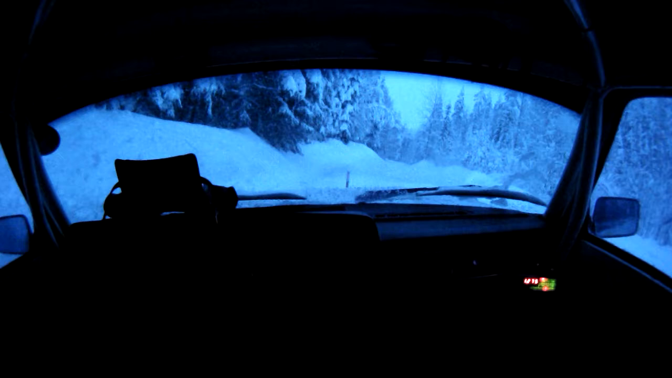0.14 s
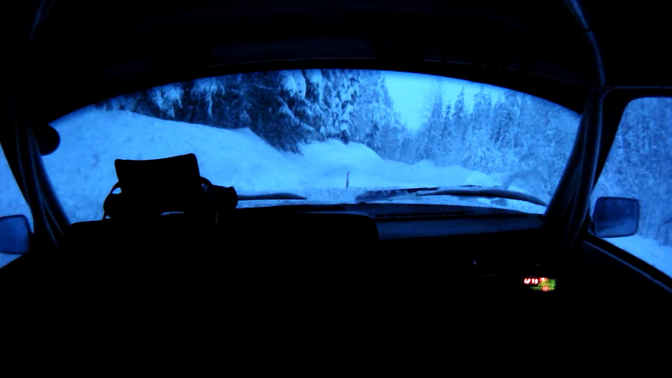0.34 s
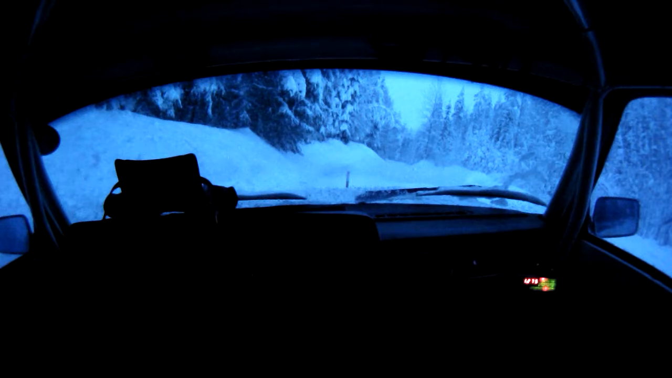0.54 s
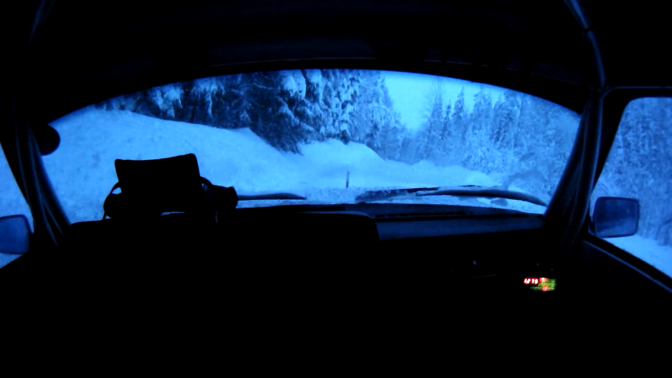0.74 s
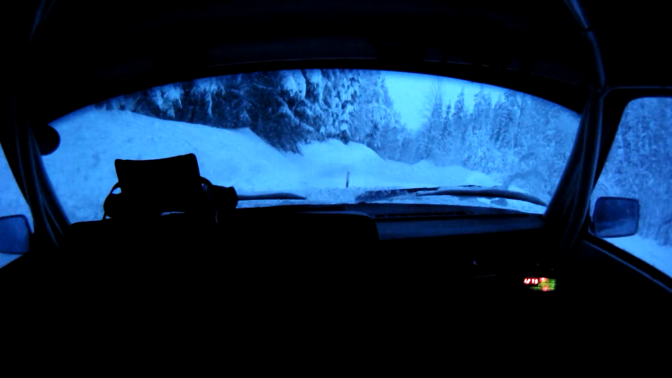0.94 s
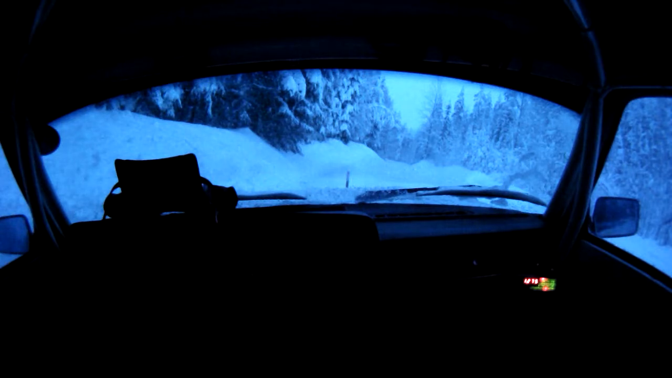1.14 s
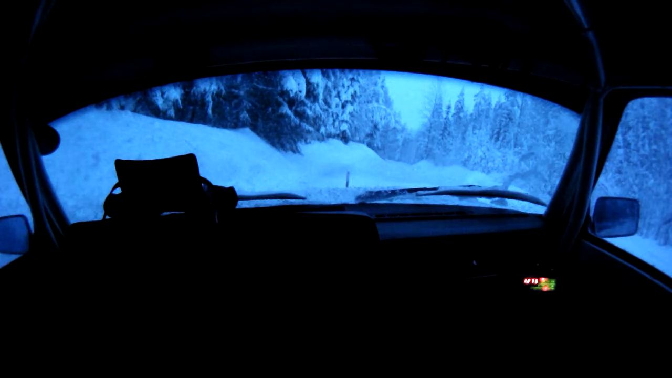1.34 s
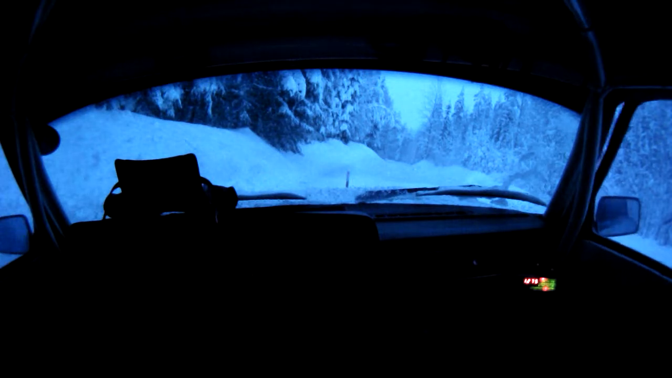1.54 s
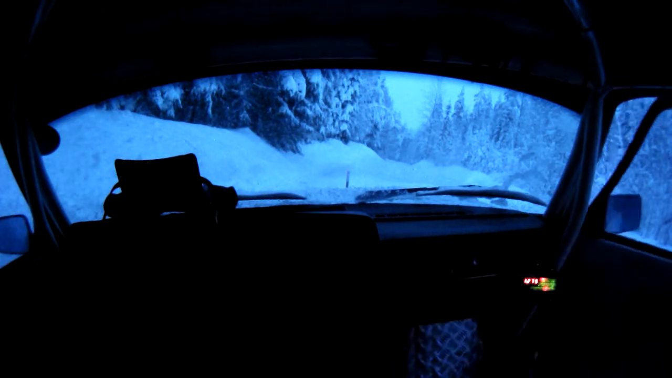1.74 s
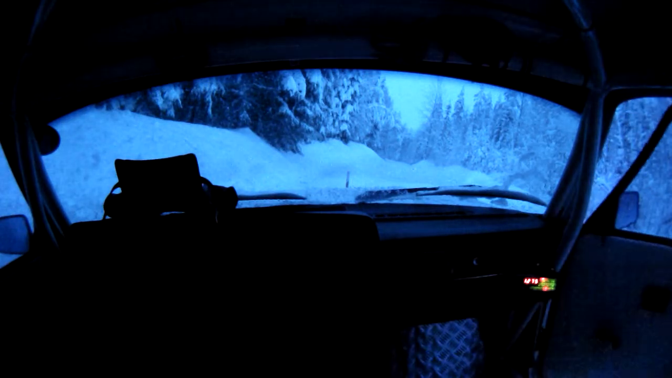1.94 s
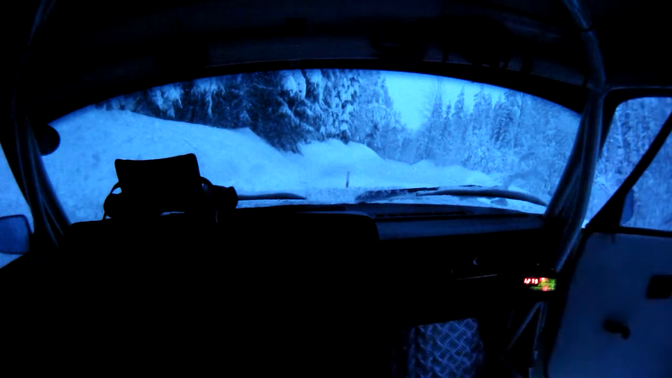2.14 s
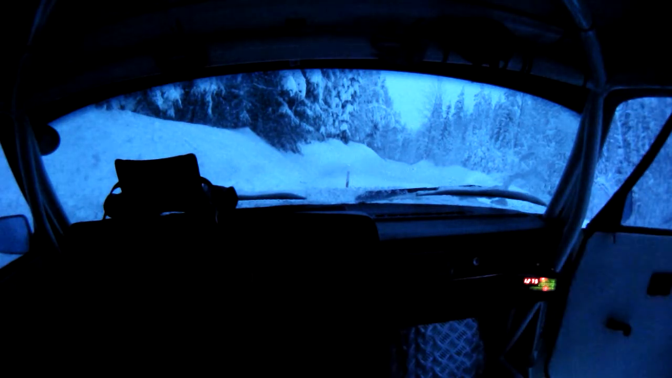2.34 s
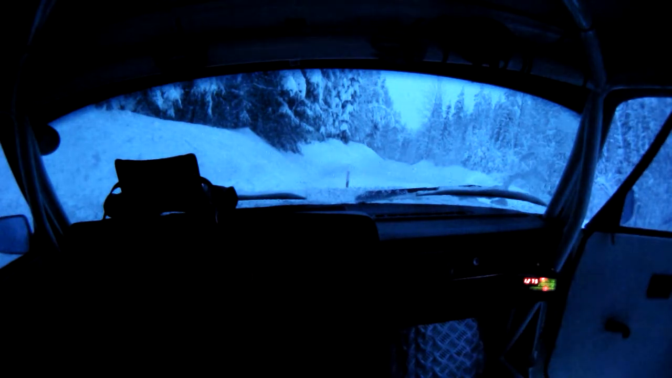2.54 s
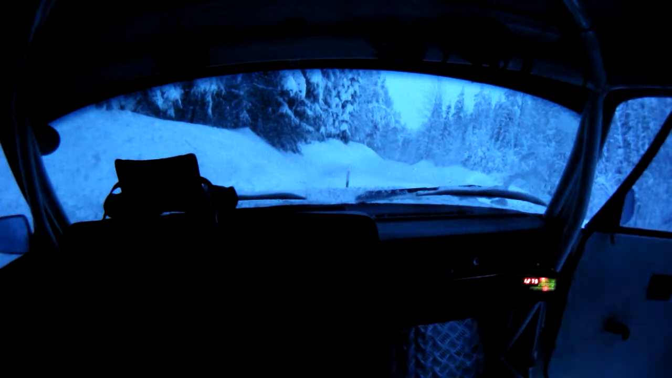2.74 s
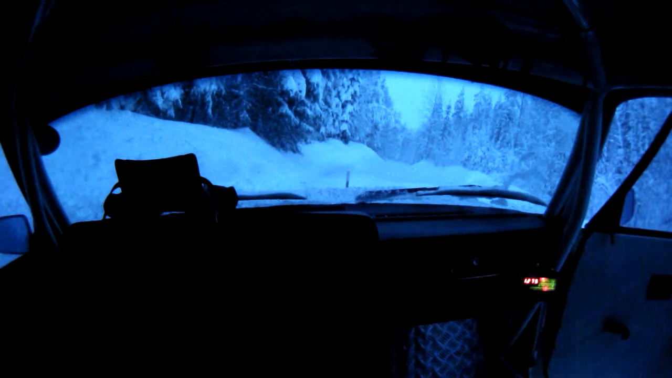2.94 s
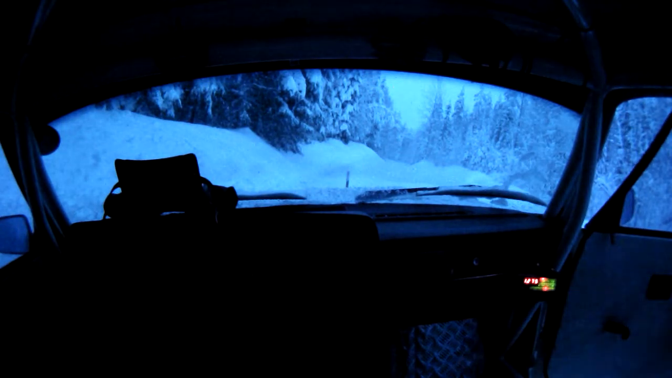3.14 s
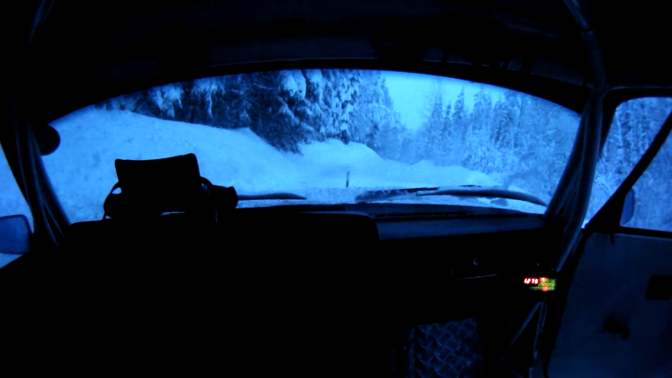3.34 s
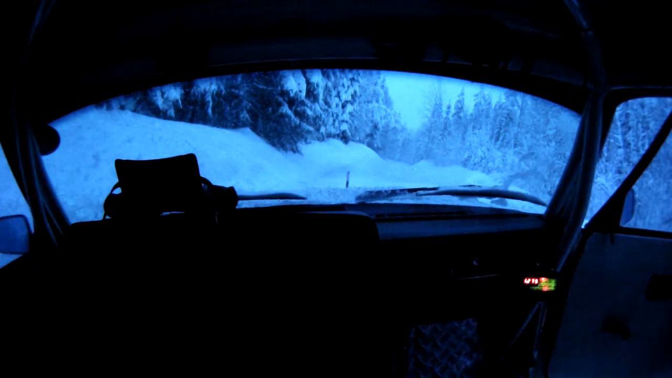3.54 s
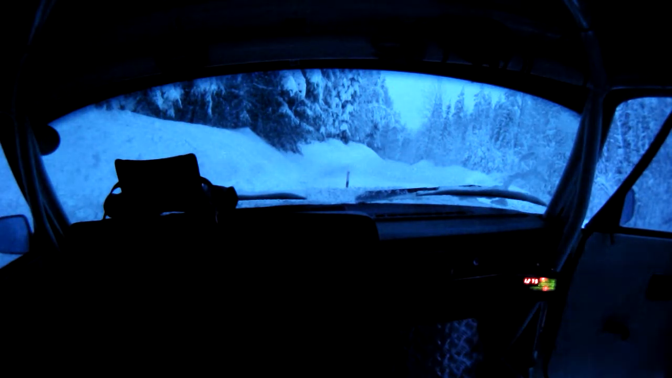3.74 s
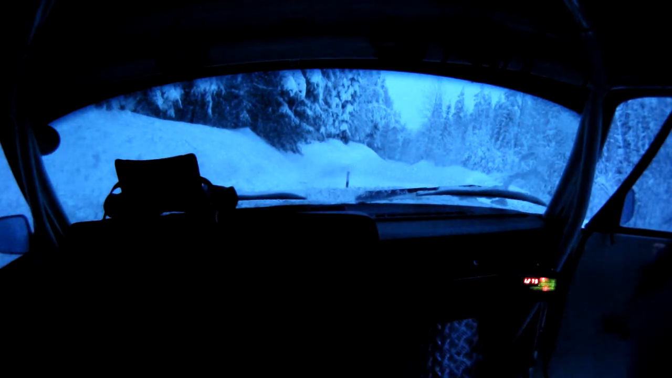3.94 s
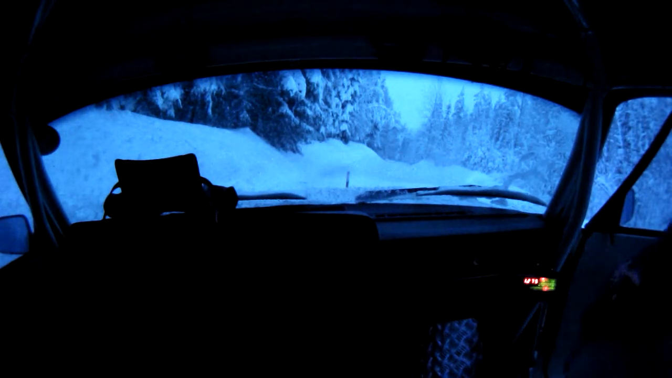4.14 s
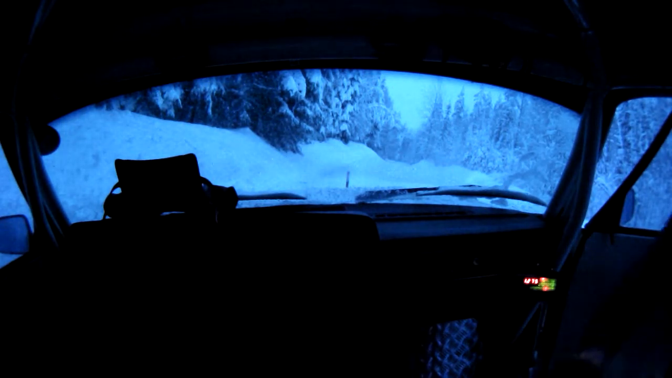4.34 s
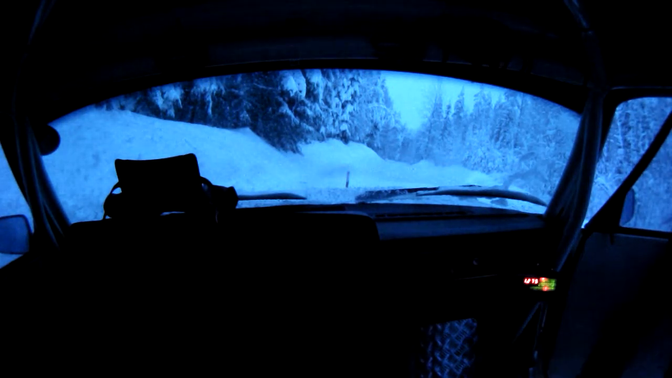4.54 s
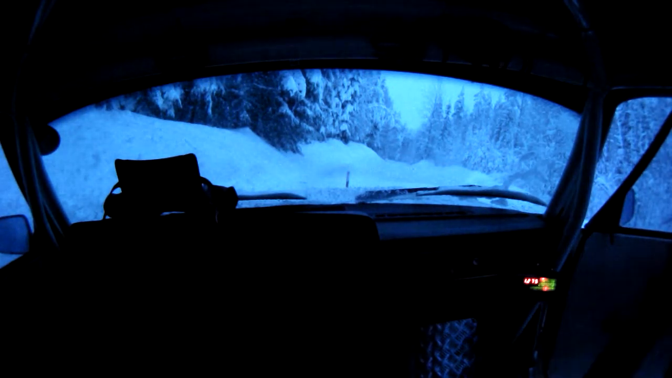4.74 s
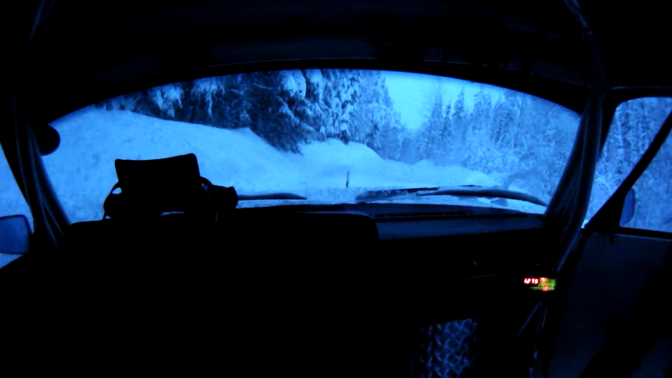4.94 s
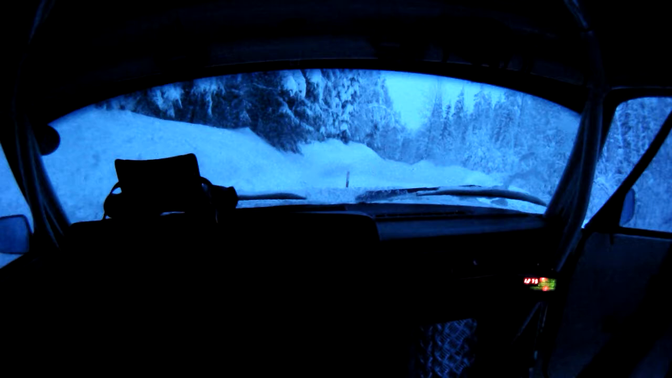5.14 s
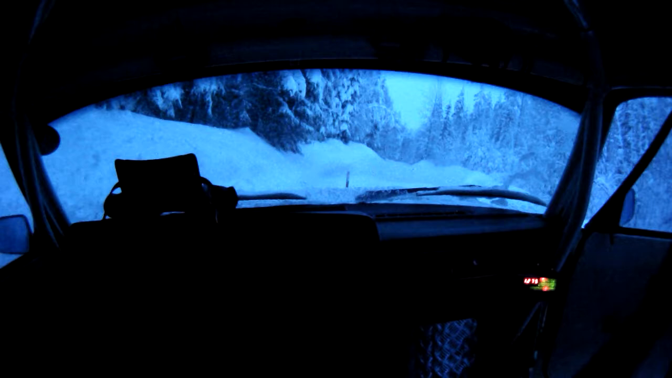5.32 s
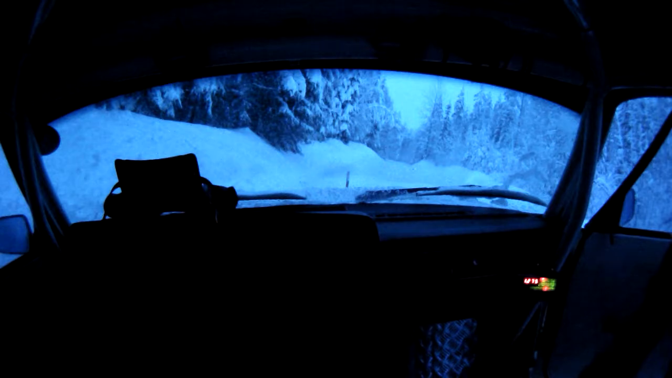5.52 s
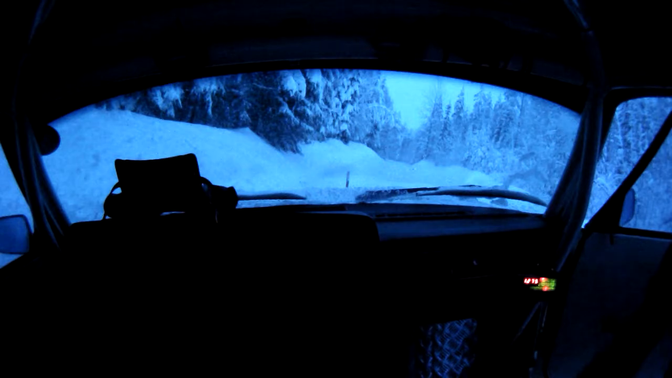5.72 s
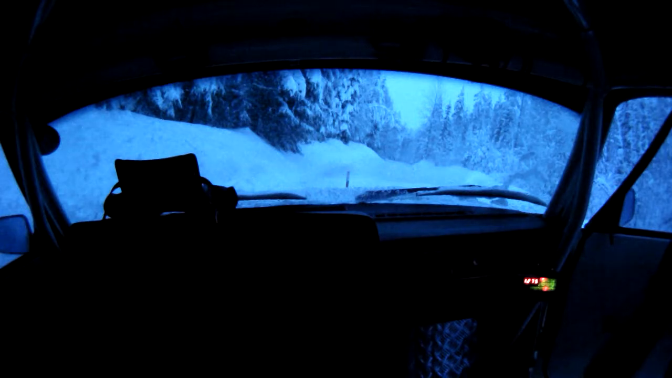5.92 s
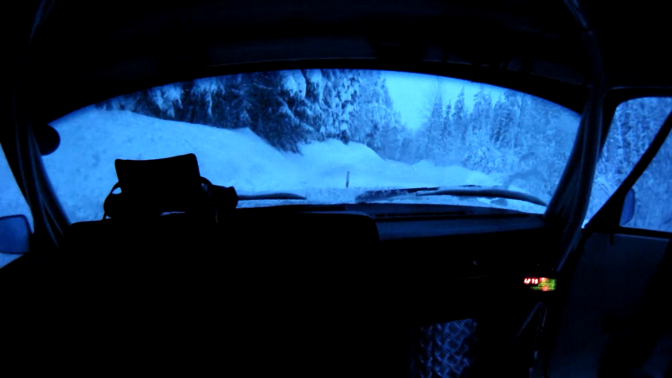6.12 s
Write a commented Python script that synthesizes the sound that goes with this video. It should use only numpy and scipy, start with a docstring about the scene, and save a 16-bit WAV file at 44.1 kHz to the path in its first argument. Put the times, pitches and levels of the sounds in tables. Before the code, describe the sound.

Heard close to the door inside a parked car, over a faint steady hiss. Small ticks come from about 0.4 seconds, and the handle knocks at 1.3. At 1.5 seconds the latch lets go with a loud, boomy clunk and a low push of cabin air. The hinge rubs faintly, and the door hits its stop with a second clunk near 2.2. Someone shifts in the seat with soft rustling, making a dull knock at 2.6 and a cluster of thumps from 3.2 to 3.6. Light plastic clicks begin around 3.8. A metal buckle clatters and briefly rings against hollow plastic from 4.3 to 4.5, followed by three loud, sharp snaps between 4.6 and 4.7. Quiet clothing rustle and a few softer clicks continue until about 5.6, then fade away by 6 seconds.

```python
"""Inside a car parked in the snow, a small stereo microphone close to the door. The handle is worked, the
latch lets go with a clunk and a suck of cabin air, and the door swings to its stop. Knocks chatter through
the trim and ring panel, cabin and floor pan; a metal buckle clatters, catches snap, cloth rustles.
Both channels hear the same sound with a different colour, over their own hiss and DC offset."""
import sys
import numpy as np
from scipy import signal
from scipy.fft import rfft, irfft
from scipy.io import wavfile
from scipy.ndimage import uniform_filter1d

SR = 44100
rng = np.random.default_rng(int(sys.argv[2]) if len(sys.argv) > 2 else 0)


def persist_wave(psi):
    """Save psi, clipped to +-1, as 16-bit WAV."""
    counts = np.round(np.clip(psi, -1, 1) * 32767).astype(np.int16)
    wavfile.write(sys.argv[1], SR, np.atleast_2d(counts).T)


N = 272538
T = np.arange(N) / SR
F = np.arange(N // 2 + 1) * SR / N + 1e-3

# someone shifting in the seat: t/s, rustle level/dB, rumble level/dB
MOVEMENT = [(0, -90.5, -87), (.79, -105, -73.5), (.84, -108, -56.5), (1.45, -86, -62.5), (1.7, -77.5, -45),
            (2.05, -74, -58.5), (3.15, -68, -62), (3.5, -63.5, -58), (3.9, -68, -57), (4.25, -75, -65),
            (4.55, -64, -52), (5.06, -64, -67), (5.46, -61, -58.5), (5.6, -68.5, -69), (5.75, -77, -75.5),
            (6.18, -88.5, -82)]


def blows():
    """Each blow on door, seat or trim chatters through the fittings and rings panel, cabin and floor."""
    # t/s, clack level/dB, crack over clack/dB, boom level/dB, depth/dB, chatter t60/s, struck place f/Hz
    hits = [(0.392, -77, 10, -74, -31.5, 0.05, 325), (0.83, -64.5, -18, -68, 18, 0.24, 320),
            (0.882, -65.5, 4.5, -71.5, -12, 0.12, 340), (1.027, -65, -5.5, -73, 2, 0.14, 255),
            (1.053, -67.5, 0, -60.5, -5.5, 0.068, 262), (1.27, -53, 5, -37.5, 2.5, 0.14, 347),
            (1.515, -26, -4.5, -20, -4, 0.094, 305), (1.549, -49, -4, -27.5, 9, 0.093, 277),
            (1.582, -44.5, -1.5, -33.5, -1.5, 0.12, 255), (1.79, -67.5, 8.5, -49.5, 0.5, 0.058, 620),
            (2.115, -58.5, -7, -44, 3, 0.39, 287), (2.131, -59, 8, -43, 7, 0.11, 343),
            (2.16, -28.5, -1, -32.5, -8, 0.13, 360), (2.363, -63, 3, -48.5, -5.5, 0.079, 410),
            (2.613, -53.5, -0.5, -37.5, 4, 0.34, 294), (2.706, -66, 3.5, -49, 13.5, 0.2, 350),
            (3.029, -53.5, 10.5, -70, -17.5, 0.096, 516), (3.201, -56, 10, -31.5, -5, 0.11, 280),
            (3.227, -56.5, 12, -25, 9.5, 0.063, 263), (3.337, -55.5, 4.5, -38.5, -3.5, 0.12, 378),
            (3.362, -52.5, 9.5, -42, 10, 0.1, 372), (3.554, -51, 11, -40.5, -5, 0.1, 326),
            (3.884, -59, 10, -59, 13, 0.071, 300), (4.297, -45.5, -29, -39, -1, 0.14, 394),
            (4.975, -67.5, 16.5, -63, 1, 0.13, 314), (6.124, -68, -2.5, -72, -14.5, 0.18, 298)]
    # modes of each part: f/Hz, level/dB, t60/s
    trim_modes = [(977, 8, 0.16), (1480, 13, 0.16), (1726, 22.5, 0.058), (1960, 13.5, 0.03),
                  (2030, -2, 0.11)]
    panel_modes = [(259, 2.5, 0.4), (279, -4, 0.42), (329, 3.5, 0.23), (378.4, -2, 0.34), (519, -0.5, 0.37),
                   (636, -2, 0.59)]
    cabin_modes = [(119.5, -3, 0.25), (132.6, -0.5, 0.7), (177, -4.5, 0.29), (205, -10, 0.56)]
    floor_modes = [(49, -22, 0.92), (63.6, 0.5, 0.21), (87.7, -1.5, 0.41)]
    strap_modes = [(2180, -68.5, 1.7)]
    # spectrum of the contact's hard edge: f/Hz, level/dB
    crack_spectrum = [(1180, -10), (2000, -8), (4250, -0.5), (5890, 1), (7230, -8), (15500, -33)]
    free_t60_s, place_db_per_octave = 0.13, 28
    knock, clack, crack, rings, boom = np.zeros((5, N))
    for hit, chance in zip(hits, rng.standard_normal((len(hits), 36))):
        s, clack_db, edge_db, boom_db, depth_db, t60, place_hz = hit
        rise = 0.0043 * 2 ** (max(boom_db + 40, 0) / 14.5)  # heavier blows build more slowly
        panel_db = boom_db - 5.5 - depth_db  # depth takes from the panel and gives to the floor pan
        floor_db = boom_db - 7.5 + depth_db
        add(crack, s, amp(clack_db + edge_db) * burst(rise, t60))
        add(clack, s, amp(clack_db) * burst(rise, 1.04 * t60, tail_db=-23.5))
        add(knock, s, amp(panel_db - 13) * burst(rise, 2.34 * t60))
        trim = ring(trim_modes, rise + 0.022, chance[::-1], detune=0.002, scatter_db=4.5)
        add(rings, s, amp(clack_db - 12) * trim)
        freedom = min(t60 / free_t60_s, 1)  # short chatter: the hand stays on and damps the panel
        # modes far from the struck place's own note are weaker
        panel = [(hz, db - place_db_per_octave * abs(np.log2(hz / place_hz)), ring_s * freedom)
                 for hz, db, ring_s in panel_modes]
        # panel, cabin and floor rings each swell in a few milliseconds after the blow
        add(rings, s, amp(panel_db) * ring(panel, rise + 0.0021, chance, detune=0.0087, scatter_db=1.5))
        add(boom, s, amp(boom_db) * ring(cabin_modes, rise + 0.0046, chance[::-1], scatter_db=1.5))
        add(boom, s, amp(floor_db) * ring(floor_modes, rise + 0.003, np.roll(chance, 5), scatter_db=6.5))
    add(boom, 2.17, ring(strap_modes, 0.01, np.zeros(2)))  # the check strap rings at the stop
    chatter = knock * noise(peaks([(407, 1010, 0)]))
    chatter += clack * (1.014 * noise(peaks([(1750, 2600, 0)])) + 0.23 * scraped(trim_modes, 9.5))
    chatter += crack * noise(shape(crack_spectrum))
    # loose parts rattle unevenly, and the low boom wavers irregularly in level
    return amp(3.1 * walk(120)) * rings + amp(0.5 * walk(300)) * chatter + amp(1.5 * walk(15)) * boom


def buckle():
    """A dropped metal buckle bounces and scrapes on hollow plastic, and both ring on."""
    # contacts: t/s, treble level/dB, plastic level/dB, metal level/dB, rise/s, chatter t60/s
    jingles = [(4.298, -79, -37, -49.5, 0.0062, 0.11), (4.402, -56, -56, -43.5, 0.0021, 0.18),
               (4.432, -69, -46.5, -28, 0.0037, 0.12), (4.448, -64, -71.5, -35.5, 0.0015, 0.044),
               (4.525, -65.5, -71, -47, 0.018, 0.074)]
    # modes of each part: f/Hz, level/dB, t60/s
    metal_modes = [(2468, -16, 0.08), (3655, -4, 0.75), (3830, -0.5, 0.13), (4130, -6.5, 0.071),
                   (4530, -10, 0.17), (5500, -8.5, 0.056), (6450, -9, 0.088), (7020, -12.5, 0.063),
                   (10550, -28, 0.1)]
    plastic_modes = [(710, 1.5, 0.2), (760, 0, 0.25), (977, -2.5, 0.12), (1214, 2, 0.21), (1755, 0, 0.13)]
    metal, plastic, treble, rings = np.zeros((4, N))
    for jingle, chance in zip(jingles, rng.standard_normal((len(jingles), 36))):
        s, treble_db, plastic_db, metal_db, rise, t60 = jingle
        contact = burst(rise, t60)
        add(metal, s, amp(metal_db) * contact)
        add(plastic, s, amp(plastic_db) * contact)
        add(treble, s, amp(treble_db) * contact)
        add(rings, s, amp(metal_db - 3) * ring(metal_modes, rise, chance, detune=0.00082, scatter_db=2.5))
        hollow = ring(plastic_modes, rise + 0.0024, chance[::-1], detune=0.0028, scatter_db=4.5)
        add(rings, s, amp(plastic_db - 0.5) * hollow)
    jangle = scraped(metal_modes, 8.5) + 0.6 * noise(peaks([(4900, 2500, 0)]))
    scrape = metal * jangle + 0.92 * plastic * scraped(plastic_modes, 29)
    return amp(3.5 * walk(90)) * rings + scrape + treble * noise(peaks([(11350, 11000, 0)]) ** 2)


def catches():
    """Plastic catches snap: a hard tick, a ping of its own pitch, a short ring of catch and cabin."""
    # t/s, level/dB, dull clack relative to the tick/dB, tick t60/s, ping f/Hz
    snaps = [(3.8382, -50, -16, 0.068, 5360), (3.9769, -36, -10, 0.012, 5680),
             (4.005, -39.5, -8, 0.049, 5300), (4.035, -53.5, -7, 0.078, 2020),
             (4.1339, -43, -7.5, 0.13, 5300), (4.199, -42.5, -14, 0.023, 4920),
             (4.2768, -52.5, -4, 0.0099, 4900), (4.5993, -17, -22, 0.01, 3820),
             (4.6465, -32, -6.5, 0.0062, 6170), (4.6731, -16.5, -35.5, 0.051, 5200),
             (4.717, -17, -14, 0.094, 6700), (4.8412, -40, -35, 0.022, 5460), (5.4092, -41, 6, 0.068, 930),
             (5.509, -48, -30, 0.02, 7400), (5.428, -41.5, -23, 0.012, 3040),
             (5.438, -41, -30.5, 0.02, 7950), (5.6236, -47.5, -9.5, 0.15, 4820)]
    # modes of a catch: f/Hz, level/dB, t60/s
    catch_modes = [(3320, 0.5, 0.032), (4600, 0.5, 0.07), (5150, 4.5, 0.06), (5800, 3.5, 0.09),
                   (6940, -0.5, 0.021), (10600, -17.5, 0.1)]
    bounce_s, bounce_db, ping_cycles = 0.015, -22.5, 75
    crack, clack, pings = np.zeros((3, N))
    for snap, chance in zip(snaps, rng.standard_normal((len(snaps), 2 * len(catch_modes)))):
        s, db, dull_db, t60, hz = snap
        tick = burst(0.00021, t60, tail_db=-12, tail_t60=0.089, hold=0.54)
        add(crack, s, amp(db) * tick)
        add(crack, s + bounce_s, amp(db + bounce_db) * tick)  # every catch lands a second time
        add(clack, s, amp(db + dull_db) * tick)
        add(pings, s, ring([(hz, db - 1, ping_cycles / hz)], 0.00078, chance, scatter_db=0.5))
        damped_modes = np.array(catch_modes) * [1, 1, min(t60 / 0.063, 1)]
        add(pings, s, amp(db - 16.5) * ring(damped_modes, 0.0033, chance[::-1]))
    bright = scraped(catch_modes, 50) + amp(-17) * noise(peaks([(11000, 19000, 0)]) ** 2)
    return pings + crack * bright + clack * noise(peaks([(2130, 3250, 0)]) ** 2)


def cabin_air():
    """Cabin pressure swings slowly, pulling first, as the seal parts and as the door meets its stop."""
    # t/s, f/Hz, level/dB, t60/s
    swings = [(1.512, 10.8, -11, 0.16), (2.604, 30.7, -27, 0.21), (2.73, 35, -43.5, 0.57),
              (3.214, 35, -37, 0.18)]
    pressure, t = np.zeros(N), T[:SR]
    for s, hz, db, t60 in swings:
        decay = np.exp(-(t / t60) ** 3.4 * np.log(1000))
        add(pressure, s, -amp(db) * np.sin(2 * np.pi * hz * t) * decay)
    return pressure


def cloth():
    """Clothing slips in fine grains near the microphone."""
    # sleeve strokes: t/s, half length/s, level/dB
    strokes = [(3.88, 0.021, -58.5), (5.325, 0.029, -64.5), (5.522, 0.025, -59.5)]
    # f/Hz, level/dB
    rustle_spectrum = [(1800, -11.5), (3000, -6), (5500, -1.5), (7000, -7), (8200, -12), (14000, -26)]
    rustle_db, _ = movement_db()
    sleeve = sum(amp(db) * np.exp(-((T - s) / half) ** 2) for s, half, db in strokes)
    slips_db = 2 * walk(16) + 2.5 * walk(200) + 0.5
    return (amp(rustle_db) + sleeve) * amp(slips_db) * noise(shape(rustle_spectrum))


def seat():
    """A shifting body scuffs seat and sill over a low rumble."""
    # single scuffs: t/s, half length/s, level/dB
    scuffs = [(1.248, 0.032, -70.5), (1.677, 0.064, -64), (2.94, 0.03, -63.5), (3.67, 0.029, -70),
              (3.767, 0.014, -67)]
    # f/Hz, level/dB
    rumble_spectrum = [(18, -7), (40, -7), (118, -15.5), (134, -5), (152, -14.5), (350, -23.5), (600, -38)]
    rustle_db, rumble_db = movement_db()
    sliding = amp(0.53 * rustle_db + 0.47 * rumble_db - 8.5)
    shoves = sum(amp(db) * np.exp(-((T - s) / half) ** 4) for s, half, db in scuffs)
    scuff = (sliding + shoves) * amp(2 * walk(28)) * noise(peaks([(1200, 1700, 0)]) ** 2)
    return scuff + amp(rumble_db + 3.5 * walk(19)) * noise(shape(rumble_spectrum))


def hinge():
    """The swinging door rubs on its hinge."""
    # t/s, level/dB
    swell = [(1.8, -100), (1.93, -75), (2.05, -65.5), (2.1, -74)]
    # f/Hz, width/Hz, level/dB
    resonances = [(920, 250, 0), (1660, 170, 2)]
    level_db = np.interp(T, *np.transpose(swell), -200, -200)
    return amp(level_db + 1.6 * walk(30.7)) * noise(peaks(resonances))


def rub():
    """A brief, faint rub sounds on two narrow resonances."""
    # t/s, level/dB
    swell = [(5.08, -87), (5.18, -58), (5.3, -72)]
    # f/Hz, width/Hz, level/dB
    resonances = [(2090, 170, 10), (6920, 270, 3.7)]
    level_db = np.interp(T, *np.transpose(swell), -200, -200)
    return amp(level_db + 2 * walk(40)) * noise(peaks(resonances))


def movement_db():
    """Rustle and rumble levels of the shifting body at every sample."""
    s, rustle_db, rumble_db = np.transpose(MOVEMENT)
    return np.interp(T, s, rustle_db), np.interp(T, s, rumble_db)


def burst(rise, t60, tail_db=-28, tail_t60=0.18, hold=1.32):
    """Envelope of a contact: it builds, holds while parts chatter, drops, and leaves a faint cabin tail."""
    t = T[:SR // 2]
    after = np.maximum(t - rise, 0)
    fall = np.exp(-np.log(1000) * (after / t60) ** hold)
    tail = amp(tail_db) * np.exp(-np.log(1000) * after / tail_t60)
    return np.minimum(t / rise, 1) * (fall + tail)


def ring(modes, rise, chance, detune=0.018, scatter_db=5.0):
    """One blow on a set of modes; the draws in chance put each a little off in strength and pitch."""
    hz, db, t60 = np.transpose(modes)[:, :, None]
    level_draw, pitch_draw = chance.reshape(2, -1)[:, :len(modes), None]
    t = T[:int(min(t60.max(), 1) * SR)]
    decays = amp(db + scatter_db * level_draw) * np.exp(-t * np.log(1000) / t60)
    tones = np.sin(2 * np.pi * hz * (1 + detune * pitch_draw) * t)
    onset = np.sin(np.pi / 2 * np.minimum(t / rise, 1)) ** 2
    return (decays * tones).sum(0) * onset


def scraped(modes, spread):
    """Noise of rms 1 in the modes of a part that is kept chattering."""
    return noise(peaks([(hz, spread / t60, db) for hz, db, t60 in modes]))


def noise(gain):
    """Noise of rms 1, coloured by a gain at each frequency."""
    coloured = irfft(rfft(rng.standard_normal(N)) * gain, N)
    return coloured / np.sqrt(np.mean(coloured ** 2))


def shape(points):
    """Gain through points (f/Hz, level/dB) on a log axis, silent outside."""
    hz, db = np.transpose(points)
    return amp(np.interp(np.log(F), np.log(hz), db, -200, -200))


def peaks(table):
    """Gain of resonances (f/Hz, width/Hz, level/dB) side by side."""
    return np.sqrt(sum(amp(db) ** 2 / (1 + ((F - hz) / (width / 2)) ** 2) ** 2 for hz, width, db in table))


def walk(rate):
    """Random levels held 1 / rate s and slewed; spread near 1."""
    step = max(int(SR / rate), 2)
    held = np.repeat(rng.standard_normal(N // step + 1), step)
    return 1.3 * uniform_filter1d(held, step)[:N]


def amp(db):
    return 10 ** (np.asarray(db) / 20)


def add(track, s, sound):
    start = int(s * SR)
    track[start:start + len(sound)] += sound[:N - start]


def scene():
    """Everything in the cabin, alike on both channels."""
    sound = blows() + buckle() + catches() + cabin_air() + cloth() + seat() + hinge() + rub()
    return np.array([sound, sound])


def record(dry):
    """The microphone: left is weaker than right in the bass, stronger above; each side has its own hiss."""
    # f/Hz, level/dB
    hiss_spectrum = [(550, -14.5), (800, 4.5), (3000, 1.5), (12300, -0.5), (15500, -10)]
    hiss_db, dc_offset = (-71, -69.5), (0.0158, 0.0394)  # left, right
    turn_hz, dull_hz, stop_hz = 420, 16500, 15700
    z = 1j * F / turn_hz
    left_over_right = 0.58 + (1.35 * z + 1.45 * z * z) / (z * z + z + 1)
    left_over_right /= 1 + (F / dull_hz) ** 4
    colour = np.array([left_over_right, np.ones(len(F))]) * 2 / (1 + left_over_right)
    sides = irfft(rfft(dry) * colour, N)
    hiss = np.array([amp(db) * noise(shape(hiss_spectrum)) for db in hiss_db])
    lowpass = signal.cheby2(9, 50, stop_hz, fs=SR, output="sos")
    return signal.sosfilt(lowpass, sides + hiss) + np.array(dc_offset)[:, None]


dry = scene()
out = record(dry)
persist_wave(out)
```